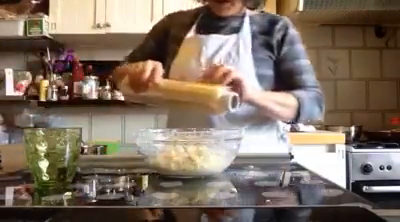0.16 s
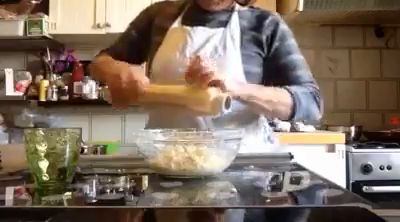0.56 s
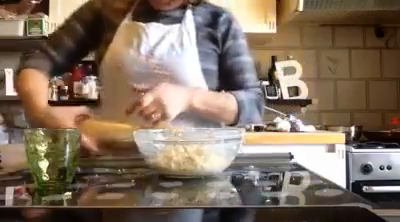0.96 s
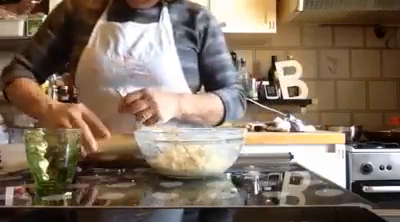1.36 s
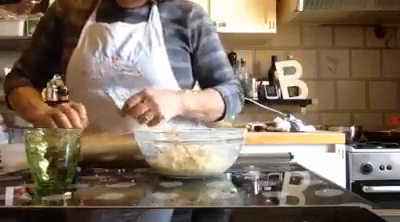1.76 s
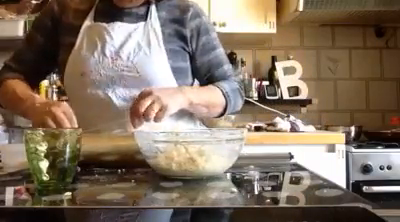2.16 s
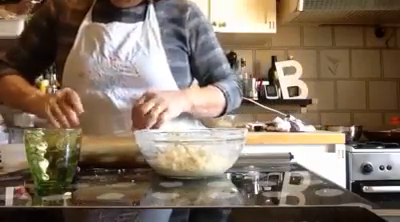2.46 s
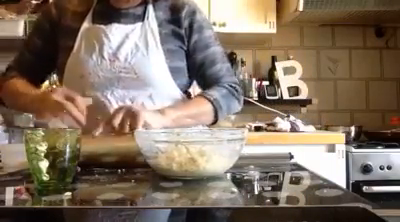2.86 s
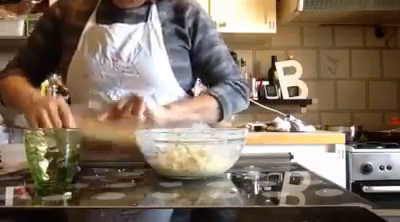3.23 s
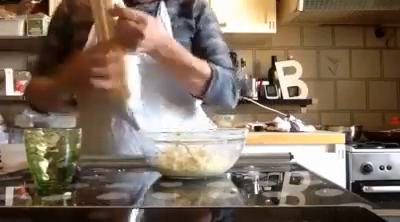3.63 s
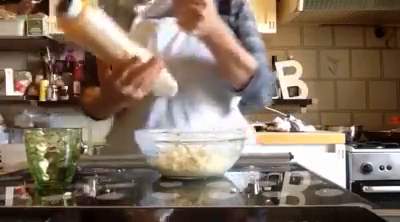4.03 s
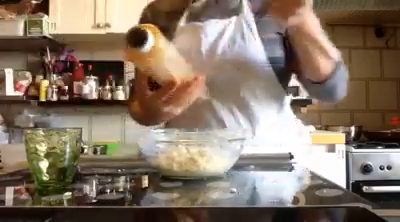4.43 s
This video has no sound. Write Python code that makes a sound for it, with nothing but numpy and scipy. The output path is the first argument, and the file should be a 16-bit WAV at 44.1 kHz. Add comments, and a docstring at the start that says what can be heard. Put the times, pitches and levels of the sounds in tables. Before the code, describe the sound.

In a tiled kitchen, thin plastic film rustles softly on its roll. The cardboard tube lands with light bumps, then two very loud hollow knocks just after one second. A quiet lull follows, then fingers pick and tap with dry ticks, and the film snaps crisply near three seconds. Softer crackles end it. Single-channel pickup, bass thin, over a low appliance drone.

```python
"""Film peels with a fine crackle off a roll of cling film at a stone kitchen worktop.
The roll knocks and bounces hard early on, then bumps softly now and again; fingers tap and pick, film snaps.
Sprays of random clicks ring the tube, its wall, the worktop and the film through tuned resonances.
A dense noise tail echoes it all, over a low appliance drone of shaped noise and a hum that swells and fades.
"""
import sys
import numpy as np
from scipy import signal
from scipy.fft import rfft, irfft
from scipy.io import wavfile
from scipy.ndimage import uniform_filter1d

SR = 44100
rng = np.random.default_rng(int(sys.argv[2]) if len(sys.argv) > 2 else 0)


def output_pcm(signal):
    """Save a mono or channel-first signal as 16-bit PCM at the path in sys.argv[1].

    Samples are clipped to [-1, 1] before scaling.
    """
    pcm = np.clip(np.atleast_2d(signal).T, -1, 1) * 32767
    wavfile.write(sys.argv[1], SR, np.round(pcm).astype(np.int16))


N = 202707  # length in samples

# the six sounding parts: rows of every push array
TUBE_ROW, WALL_ROW, PIPE_ROW, WORKTOP_ROW, SHEET_ROW, FIZZ_ROW = range(6)
SLOW_ROWS = [PIPE_ROW, WORKTOP_ROW]


def undb(db):
    """Amplitude factor of a level in dB."""
    return 10 ** (np.asarray(db) / 20)


def unit(x):
    """Scale to an RMS of 1."""
    return x / np.sqrt(np.mean(x ** 2))


def band(x, hz, width):
    """Resonance with gain 1 at its centre."""
    b, a = signal.iirpeak(hz, hz / width, fs=SR)
    return signal.lfilter(b, a, x)


def body(bands, x, probe):
    """Sum of resonances, alternating in sign, scaled so that white noise passes at its own level."""
    def ring(v):
        return sum((-1) ** k * undb(db) * band(v, hz, width) for k, (hz, width, db) in enumerate(bands))
    return ring(x) / np.sqrt(np.mean(ring(probe) ** 2))


def widths(modes):
    """Turn ring times into bandwidths: the longer a mode rings, the narrower it is."""
    return [(hz, np.log(1000) / (np.pi * t60), db) for hz, db, t60 in modes]


def crackle(rate, scatter_db):
    """Dense random clicks of very unequal size, rate per second on average."""
    on = rng.random(N) < rate / SR
    size = rng.standard_normal(N) * undb(scatter_db * rng.exponential(size=N))
    return unit(on * size)


def walk(rate):
    """Random levels held 1 / rate s and slewed twice; they spread about 0.5 around zero."""
    k = int(SR / rate)
    held = np.repeat(rng.standard_normal(N // k + 1), k)
    slewed = uniform_filter1d(uniform_filter1d(held, k), k)
    return 0.65 * slewed[:N]


# Air column of the tube, one end half shut by the hand.
# Each row: pitch in Hz, balance in dB, ring time t60 in seconds.
TUBE_MODES = [(607.5, -2.5, 0.029), (684, -1, 0.046), (1119.5, -2, 0.049), (1208, -10.5, 0.016),
              (1721, -13.5, 0.1)]
# Dull cardboard wall. Each row: centre in Hz, width in Hz, balance in dB.
WALL_BANDS = [(381, 81, 6), (498, 200, 5), (565, 17, 8.5), (796, 460, -4), (1200, 140, -28)]
# Lowest note of the tube. Each row: pitch in Hz, balance in dB, ring time t60 in seconds.
PIPE_MODES = [(233.4, -3.5, 0.24), (257.7, -9.5, 0.74)]
# Worktop and the cupboards under it. Each row: pitch in Hz, balance in dB, ring time t60 in seconds.
WORKTOP_MODES = [(134.1, -4.5, 0.16), (154, 7.5, 0.33), (173.2, 8, 0.35), (193.5, -1, 0.27)]
# Slap of the stretched sheet. Each row: centre in Hz, width in Hz, balance in dB.
SHEET_BANDS = [(2495, 1650, 10), (3300, 300, -16), (3400, 600, -3), (4970, 3500, -8)]
# Fizz of the tiny peeling points. Each row: centre in Hz, width in Hz, balance in dB.
FIZZ_BANDS = [(6340, 10430, 9.5), (9690, 10640, 14.5), (15020, 5520, 9.5)]


def roll():
    """Stick-slip clicks ring each part that is hit or rubbed; the low parts take a blow as a smooth shove."""
    blow, snap = hits()
    rub = rustle()
    probe = rng.standard_normal(SR)
    spray = crackle(11000, scatter_db=1.43)
    force = blow * (spray + snap) + rub * crackle(6000, scatter_db=2.0)
    # pipe note and worktop feel a blow whole, not as single clicks
    force[SLOW_ROWS] = blow[SLOW_ROWS] + rub[SLOW_ROWS] * spray
    # in the order of the part rows
    parts = (widths(TUBE_MODES), WALL_BANDS, widths(PIPE_MODES), widths(WORKTOP_MODES),
             SHEET_BANDS, FIZZ_BANDS)
    return sum(body(part, push, probe) for part, push in zip(parts, force))


# The roll knocks and bounces hard on the worktop early on, then bumps softly now and again.
# Each row: start in seconds, push in dB on tube, pipe note, worktop, film slap and film fizz,
# contact decay in milliseconds.
KNOCK_HITS = [(0.773, -35, -29, -31, -41, -68, 4.9), (0.781, -25.5, -25.5, -27, -28, -77, 19),
              (0.978, -20, -36.5, -31, -30, -33.5, 3), (0.994, -21.5, -46, -22.5, -25.5, -34, 8),
              (1.006, -17, -24.5, -38, -19, -26.5, 6.7), (1.077, -48, -34.5, -32, -38.5, -52, 4.3),
              (1.275, -3, -17, -32.5, -9.5, -27, 6.2), (1.284, -12, -17, -44.5, -15, -25, 5.3),
              (1.296, -30, -43.5, -23, -24.5, -35, 12), (1.326, -6.5, -11, -31.5, -12, -20, 4.8),
              (1.335, -18, -23.5, -32, -16.5, -28.5, 6.3), (1.345, -22.5, -28, -24.5, -17, -23, 4.7),
              (1.383, -24, -27, -35, -43, -32, 3.4), (1.68, -38.5, -44.5, -60.5, -73.5, -57.5, 5.9),
              (3.008, -46, -55, -44.5, -52, -55, 6), (3.028, -57, -42, -46, -43, -46, 4.6),
              (3.05, -41.5, -52, -48, -56, -57, 2.5), (3.249, -51, -43.5, -50, -59, -58, 9),
              (3.973, -44, -43, -46, -55, -55, 5.7), (3.995, -44, -38, -50, -55, -55, 7.6)]
# Fingers tap and pick at the roll throughout, and the film snaps.
# Each row: start in seconds, contact decay in milliseconds, first click in dB over the chatter,
# push in dB on tube, wall, film slap and film fizz.
TAP_HITS = [(0.632, 12, 4, -40, -58, -65, -39.5), (0.663, 5, 16, -45, -49, -59, -57),
            (0.951, 5.4, 20, -34, -49, -43, -38.5), (1.219, 21, 10, -41, -38, -41, -47.5),
            (1.252, 9.7, -6, -24.5, -33, -28.5, -41), (1.717, 8.6, 4.5, -43.5, -58, -49.5, -56.5),
            (2.276, 8, 12, -49, -62, -49, -45), (2.298, 8, 3, -34.5, -58, -52, -43),
            (2.321, 9.6, 22.5, -26.5, -33.5, -43, -34.5), (2.472, 12, 8, -29.5, -37, -43, -74),
            (2.481, 4.4, 7, -24, -36, -33.5, -63), (2.66, 5.6, 16, -48, -58, -45.5, -38),
            (2.672, 2.5, 16, -33.5, -48, -56, -58), (2.687, 3, 3, -31, -46, -54, -56),
            (2.706, 3.3, 1, -27, -48, -52, -55), (2.728, 4, 8, -25, -43, -42, -48),
            (2.735, 7.5, 17.5, -25.5, -29.5, -35, -54), (2.753, 4.2, 12, -22.5, -35.5, -25, -43),
            (2.773, 6.5, 20, -29, -39, -31, -31), (2.813, 6.4, 3, -32, -58, -42, -31.5),
            (2.922, 8.2, 10, -37.5, -53.5, -44, -48.5), (3.118, 3.25, 13.5, -29, -56, -13.5, -22.5),
            (3.241, 8, 9, -62, -39, -59, -58), (3.294, 5, 23, -60, -62, -60, -41),
            (3.51, 8, 11, -48, -49, -45, -53), (3.535, 8, 18, -40.5, -56, -53.5, -48),
            (3.574, 2.7, 10, -47, -45, -39.5, -38), (3.622, 18, 1, -38, -46, -70, -58),
            (3.979, 6, -6, -38, -38, -60, -52), (4.027, 6.7, 12, -30, -36.5, -39, -49),
            (4.043, 9.4, 7, -40, -40, -35, -44), (4.058, 3.66, 14.5, -23, -24, -21, -25),
            (4.188, 6.9, 0, -36.5, -46, -53, -31.5), (4.194, 3.04, 17.5, -33, -34, -42, -23.5)]
KNOCK_WALL_DB, KNOCK_CLICK_DB = 0, 12.5  # wall relative to the tube; first click over the chatter
TAP_PIPE_DB, TAP_WORKTOP_DB = -30, -32  # relative to the tube
RISE_MS, SHOVE_MS = 0.55, 0.65  # onset of a contact; decay of the shove on pipe note and worktop
FIZZ_CLICK_DB = -5  # the peeling points feel less of the first click


def hits():
    """Each contact pushes the parts with a fast rise and a decay, and adds one first sharp click."""
    rows = []
    for start, tube, pipe, worktop, slap, fizz, ms in KNOCK_HITS:
        rows.append((start, ms, KNOCK_CLICK_DB, tube, tube + KNOCK_WALL_DB, pipe, worktop, slap, fizz))
    for start, ms, click, tube, wall, slap, fizz in TAP_HITS:
        rows.append((start, ms, click, tube, wall, tube + TAP_PIPE_DB, tube + TAP_WORKTOP_DB, slap, fizz))

    push, snap = np.zeros((6, N)), np.zeros((6, N))
    t_ms = 1000 * np.arange(int(0.4 * SR)) / SR
    for start, ms, click_db, *push_db in rows:
        i = int(start * SR)
        contact = (1 - np.exp(-t_ms / RISE_MS)) * np.exp(-t_ms / ms)
        shape = np.tile(contact, (6, 1))
        shape[SLOW_ROWS] = np.exp(-t_ms / SHOVE_MS)
        push[:, i:i + len(t_ms)] += (undb(push_db)[:, None] * shape)[:, :N - i]
        snap[:, i + int(SR * RISE_MS / 1000)] = undb(click_db)
    snap[FIZZ_ROW] *= undb(FIZZ_CLICK_DB)
    return push, snap


# Dull rumble of the hands moving the roll, gliding from row to row.
# Each row: time in seconds, push on the pipe note in dB, push on the worktop in dB.
HAND_RUMBLE = [(0, -70.5, -70), (0.5, -74, -64), (0.75, -59, -58.5), (0.9, -72, -73), (1.5, -41.5, -75),
               (1.75, -57, -62), (2.13, -69, -65), (2.4, -61, -60.5), (2.6, -62, -63), (2.75, -50.5, -66),
               (2.95, -79, -56), (3.05, -66.5, -51), (3.3, -68, -61.5), (3.56, -51.5, -57.5),
               (3.86, -75, -58.5), (3.972, -47.5, -46), (4.2, -60.5, -58), (4.6, -63, -54.5)]
# Pulls that peel or crumple the film.
# Each row: loudest moment in seconds, swell in seconds, hold in seconds,
# push in dB on film fizz, body of the sheet and tube.
FILM_PULLS = [(0.01, 0.06, 0.23, -50, -50.5, -67.5), (0.301, 0.23, 0.17, -54, -54, -72.5),
              (0.508, 0.075, 0.077, -49.5, -54.5, -67), (0.626, .04, 0.0072, -48.5, -53, -53.5),
              (2.32, 0.21, 0.0086, -54, -51, -57), (2.488, 0.045, 0.0061, -48.5, -47, -43.5),
              (2.674, 0.0083, .02, -76, -57, -56), (2.738, 0.015, 0.0041, -37, -38.5, -40),
              (2.866, 0.039, .05, -65, -77, -82), (3.004, 0.078, 0.013, -57.5, -54, -55.5),
              (3.114, 0.0069, 0.0038, -36.5, -32.5, -40.5), (3.216, 0.02, 0.0091, -53, -72, -60),
              (3.286, 0.016, .02, -40, -63, -66), (3.328, .03, 0.0085, -73, -44, -52.5),
              (3.549, 0.24, 0.0079, -51, -59.5, -54), (3.685, 0.078, .01, -46, -50.5, -56),
              (3.839, 0.11, 0.058, -60.5, -59, -64), (3.938, 0.024, 0.0094, -43, -41.5, -54),
              (3.979, 0.034, 0.0061, -46.5, -58, -50), (4.032, 0.027, 0.0069, -43.5, -55, -38.5),
              (4.26, 0.065, 0.079, -56, -58, -62.5), (4.448, 0.1, .01, -57.5, -58, -63.5),
              (4.59, 0.098, 0.011, -66, -60.5, -66)]
HANDLING_TUBE_DB = -10.5  # relative to the pipe note
SWELL_DB, RELEASE_DB_PER_S = 27.5, 185  # climb over one swell time; fall after the hold
RUB_WALL_DB = 1.07  # wall relative to the tube


def rustle():
    """Slow push of the hands: each pull swells, holds and dies away; all parts flutter together."""
    push, t = np.zeros((6, N)), np.arange(N) / SR
    times, pipe_db, worktop_db = np.transpose(HAND_RUMBLE)
    push[PIPE_ROW] = undb(np.interp(t, times, pipe_db))
    push[WORKTOP_ROW] = undb(np.interp(t, times, worktop_db))
    push[TUBE_ROW] = push[PIPE_ROW] * undb(HANDLING_TUBE_DB)
    for peak, swell, hold, fizz_db, sheet_db, tube_db in FILM_PULLS:
        climb_db = np.minimum(SWELL_DB * (t - peak) / swell, 0)
        fall_db = RELEASE_DB_PER_S * np.maximum(t - peak - hold, 0)
        shape = undb(climb_db - fall_db)
        push[[FIZZ_ROW, SHEET_ROW, TUBE_ROW]] += undb([[fizz_db], [sheet_db], [tube_db]]) * shape
    push[WALL_ROW] = push[TUBE_ROW] * undb(RUB_WALL_DB)
    smooth = uniform_filter1d(push, size=400)  # rounds the corners over 9 ms
    return smooth * undb(1.4 * walk(60))


# Tail of the tiled kitchen. Each row: centre in Hz, decay time t60 in seconds, balance in dB.
ECHO_BANDS = [(152, 0.51, -3), (258, 0.2, -11.5), (373, 0.55, -3.5), (636, 0.33, -3), (1990, 0.47, -1),
              (3660, 0.44, 4), (8000, 0.53, -4.5), (12100, 0.28, 4)]
ECHO_DB, ECHO_GAP_S = 9.5, 0.0013  # gain of the whole tail; silence before it starts


def echo(x):
    """Tiles and cupboards return a dense noise tail, each band dying at its own pace.

    Overlapping slices of sound cycle through twelve random tails, 30 slices a second.
    """
    t, step = np.arange(SR * 3 // 4) / SR, SR // 30
    noise = rng.standard_normal((12, len(ECHO_BANDS), len(t)))
    tails = 0
    for k, (hz, t60, db) in enumerate(ECHO_BANDS):
        decay = undb(db - 60 * t / t60)
        tails = tails + decay * band(noise[:, k], hz, 0.7 * hz) / np.sqrt(t60)
    tails = tails * (t > ECHO_GAP_S) / np.sqrt(SR)

    out, fade = np.zeros(N + len(t) + 4 * step), np.hanning(2 * step + 1)[:-1]
    padded = np.concatenate([np.zeros(step), x, np.zeros(2 * step)])
    for k, i in enumerate(range(0, N + step, step)):
        wet = signal.fftconvolve(padded[i:i + 2 * step] * fade, tails[k % len(tails)])
        out[i:i + len(wet)] += wet
    return undb(ECHO_DB) * out[step:step + N]


# Spectrum of the kitchen background. Each row: frequency in Hz, relative density in dB.
KITCHEN_SPECTRUM = [(71, -19), (120, -5), (160, -15.5), (177, -19), (271, -23.5), (353, -23), (459, -16.5),
                    (764, -19.5), (1530, -27), (1650, -20), (4570, -27), (14300, -26), (15500, -44)]
KITCHEN_DB = -58  # RMS level around which it wavers


def kitchen():
    """Appliance drone and room hiss: noise shaped by one spectrum, wavering a little."""
    hz, db = np.transpose(KITCHEN_SPECTRUM)
    f = np.maximum(np.fft.rfftfreq(N, 1 / SR), 1)
    density = undb(np.interp(np.log(f), np.log(hz), db))
    hiss = irfft(rfft(rng.standard_normal(N)) * density, N)
    return unit(hiss) * undb(KITCHEN_DB + 0.37 * walk(4.6))


# A low hum swells and fades.
# Each row: centre in seconds, half width (to 1/e) in seconds, RMS level at the centre in dB.
HUM_SWELLS = [(0.802, .5, -74), (2.2, 0.47, -58), (2.951, .12, -54.5), (3.4, 0.25, -62),
              (4.02, 0.074, -58.5), (4.3, 0.12, -68)]
HUM_HZ, HUM_WANDER = 107, 3.3  # middle pitch; multiplies walk(), so the pitch strays some 1.6 Hz


def hum():
    """A nearly pure low tone whose pitch wavers slightly."""
    t = np.arange(N) / SR
    pitch_hz = HUM_HZ + HUM_WANDER * walk(5.0)
    tone = np.sqrt(2) * np.sin(2 * np.pi * np.cumsum(pitch_hz) / SR)
    level = sum(undb(db) * np.exp(-((t - centre) / width) ** 2) for centre, width, db in HUM_SWELLS)
    return tone * level


def scene():
    """The roll and its echo over the kitchen background and the hum, as one channel."""
    near = roll()
    return (near + echo(near) + kitchen() + hum())[None]


MIC_LOW_HZ, TOP_HZ = 94.1, 14850  # bass cut; treble cut
CEILING = 0.8  # amplitude scale of the soft limit


def record(dry):
    """The microphone loses deep bass, bends loud peaks unevenly (a deep thump under knocks), cuts the top."""
    bass_cut = signal.butter(5, MIC_LOW_HZ, "high", fs=SR, output="sos")
    thin = signal.sosfilt(bass_cut, dry)
    top = np.tanh(thin / CEILING)
    # the squared part makes the bend lopsided
    bent = CEILING * top * undb(0.36) + 0.057 * top ** 2
    offset_cut = signal.butter(1, 22, "high", fs=SR, output="sos")
    bent = signal.sosfilt(offset_cut, bent)
    treble_cut = signal.ellip(10, 0.2, 75, TOP_HZ, fs=SR, output="sos")
    return signal.sosfilt(treble_cut, bent)


dry = scene()
out = record(dry)
output_pcm(out)
```